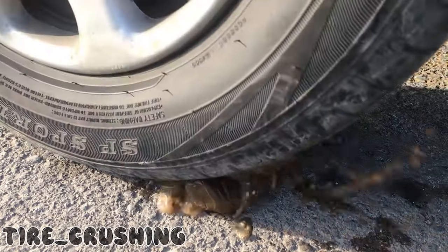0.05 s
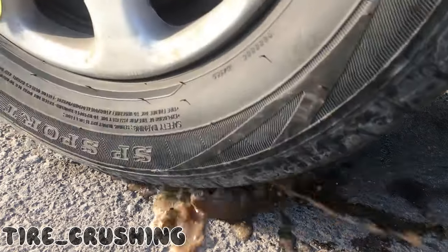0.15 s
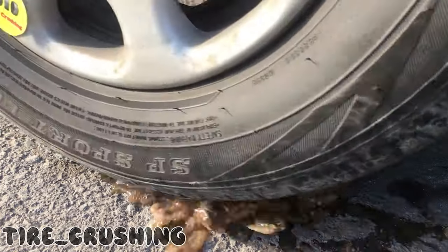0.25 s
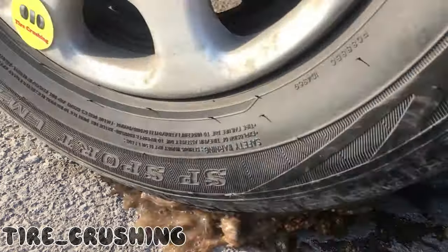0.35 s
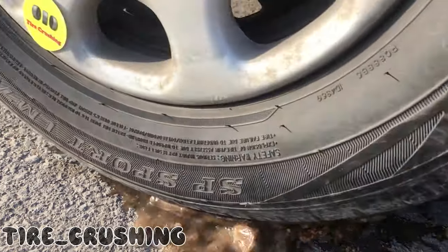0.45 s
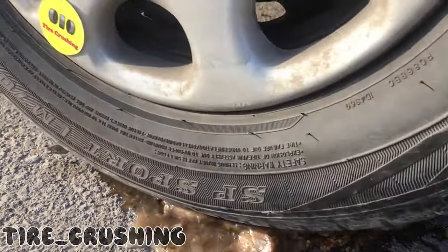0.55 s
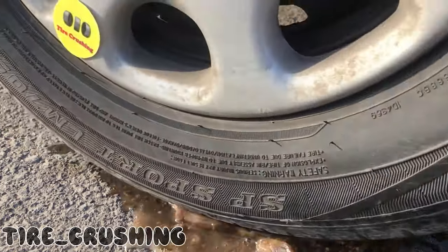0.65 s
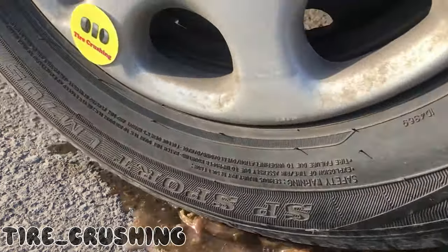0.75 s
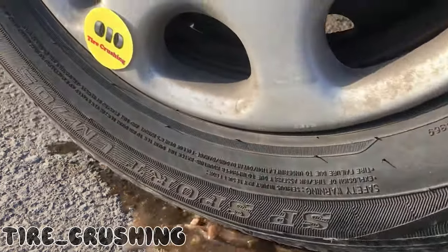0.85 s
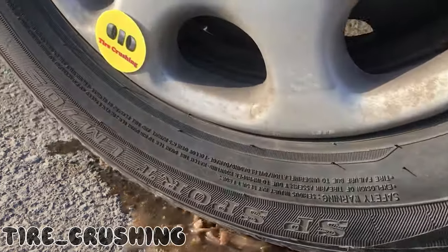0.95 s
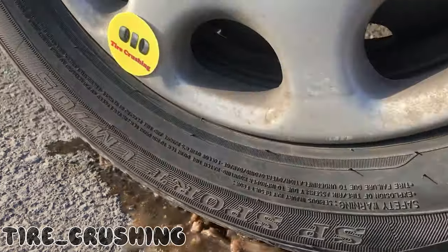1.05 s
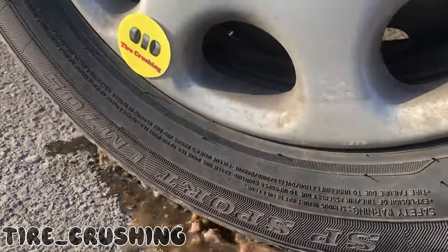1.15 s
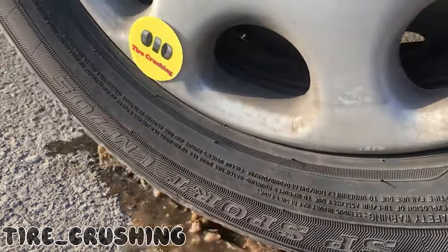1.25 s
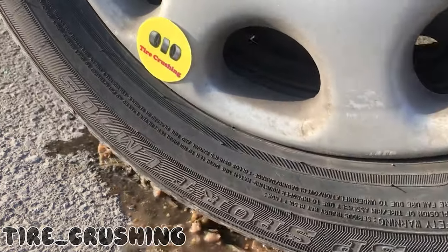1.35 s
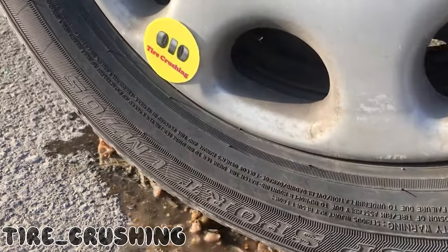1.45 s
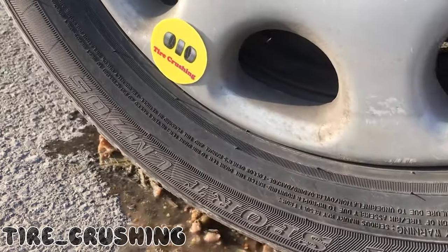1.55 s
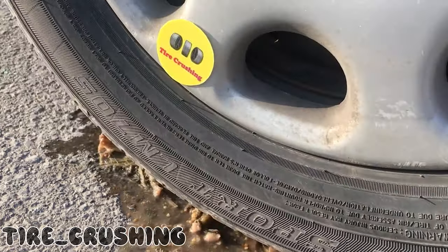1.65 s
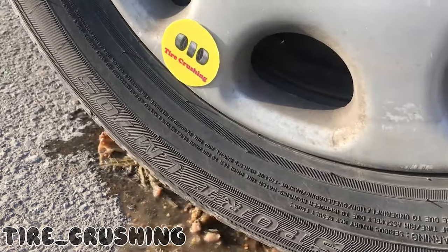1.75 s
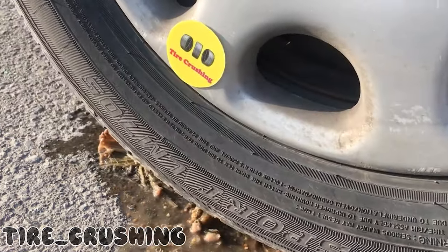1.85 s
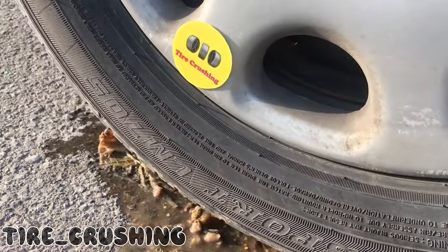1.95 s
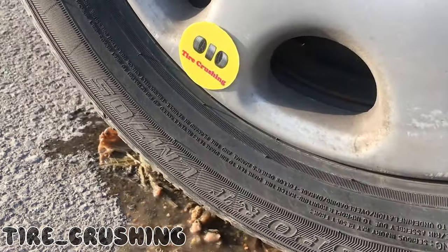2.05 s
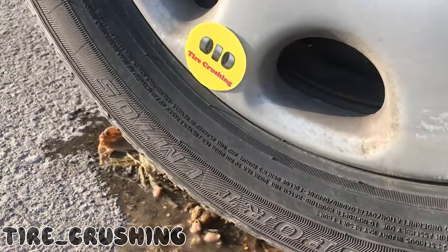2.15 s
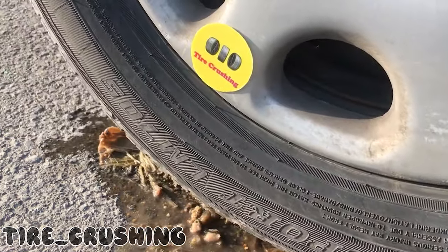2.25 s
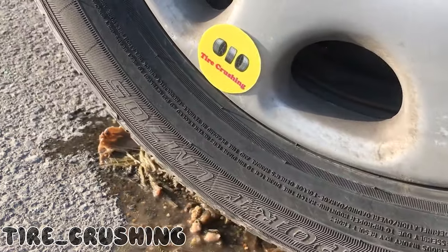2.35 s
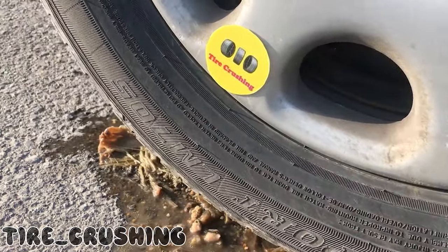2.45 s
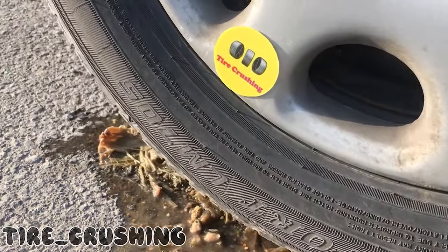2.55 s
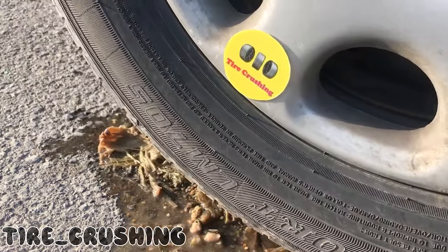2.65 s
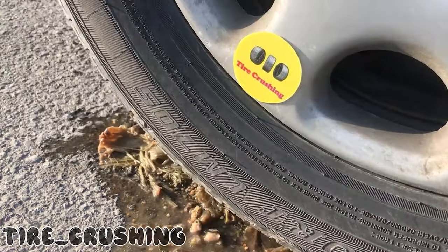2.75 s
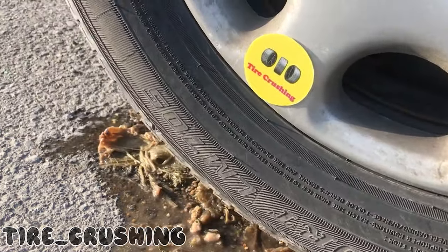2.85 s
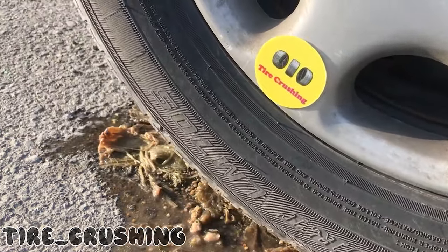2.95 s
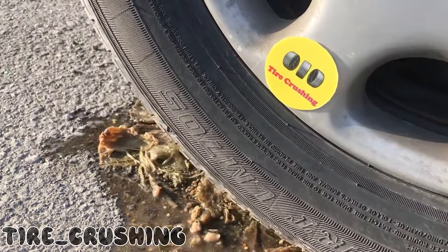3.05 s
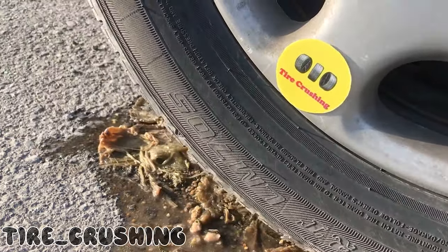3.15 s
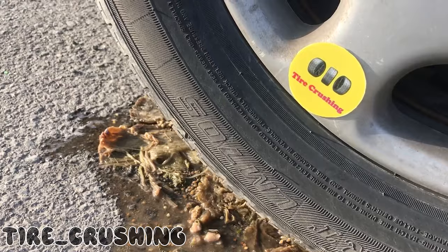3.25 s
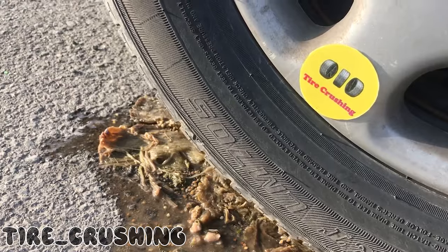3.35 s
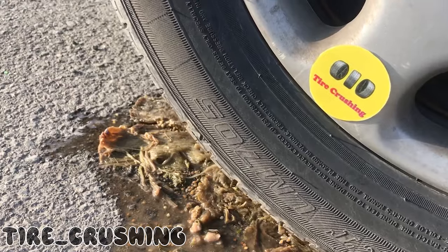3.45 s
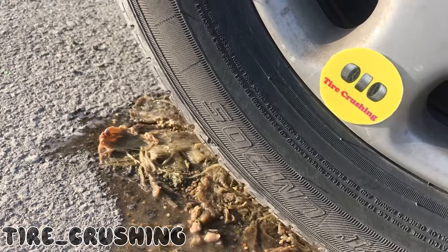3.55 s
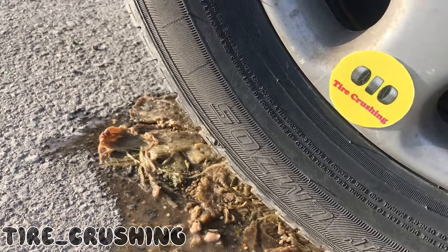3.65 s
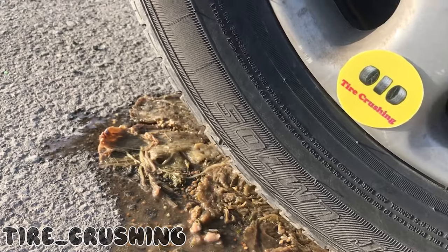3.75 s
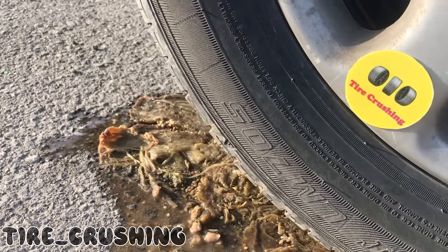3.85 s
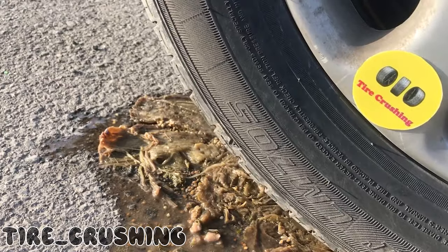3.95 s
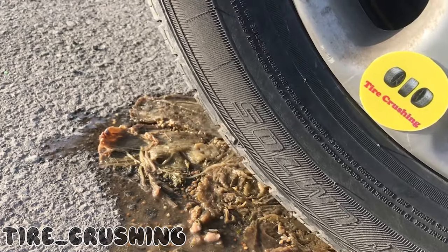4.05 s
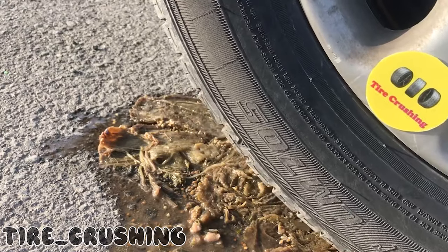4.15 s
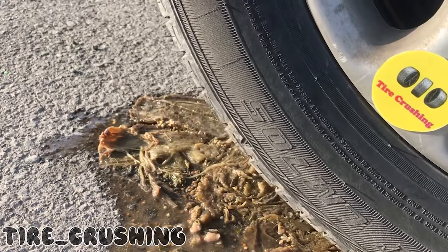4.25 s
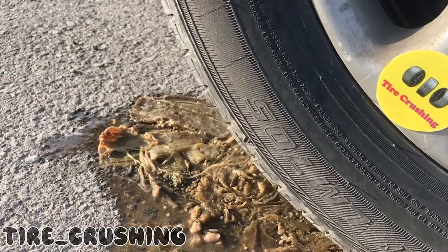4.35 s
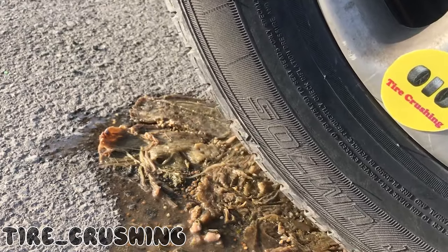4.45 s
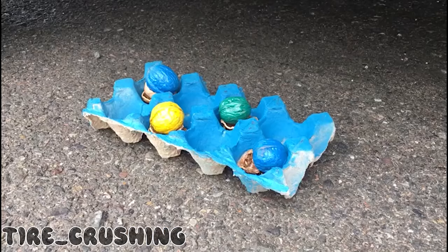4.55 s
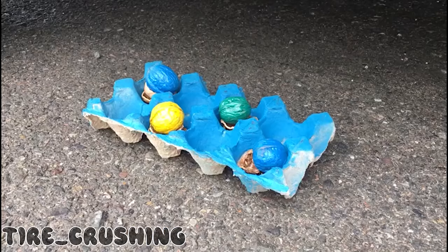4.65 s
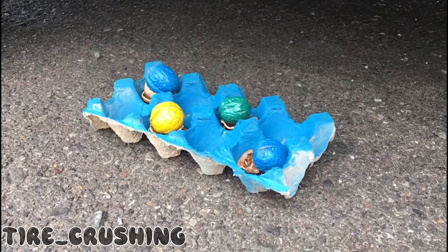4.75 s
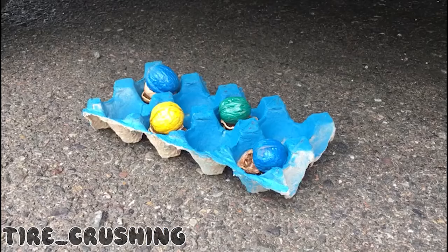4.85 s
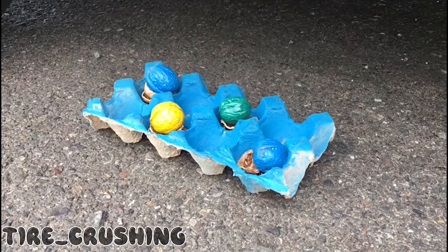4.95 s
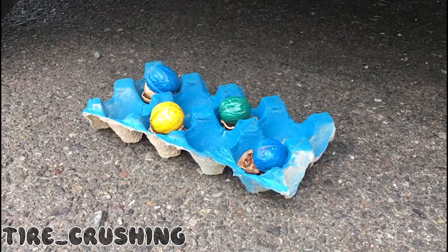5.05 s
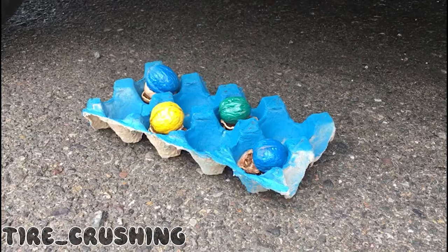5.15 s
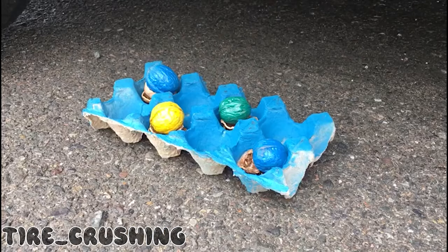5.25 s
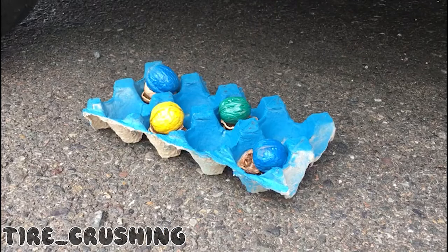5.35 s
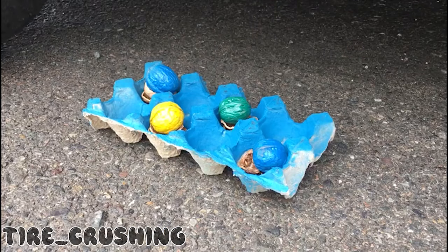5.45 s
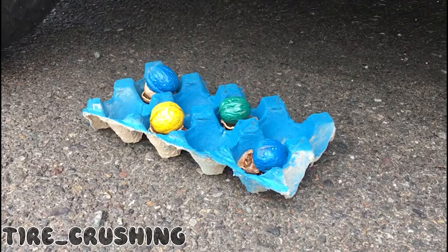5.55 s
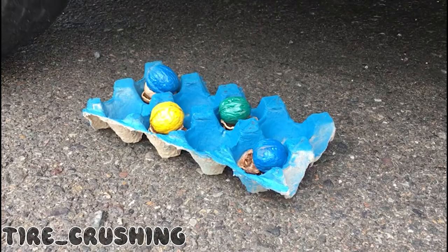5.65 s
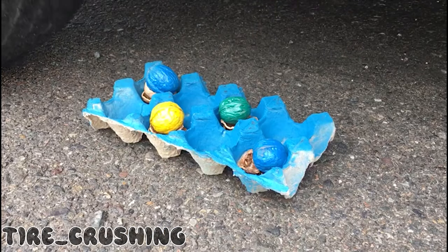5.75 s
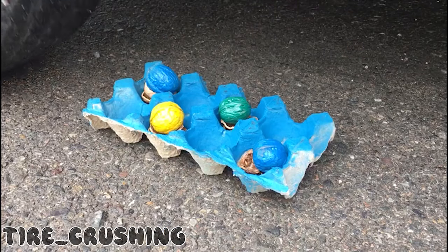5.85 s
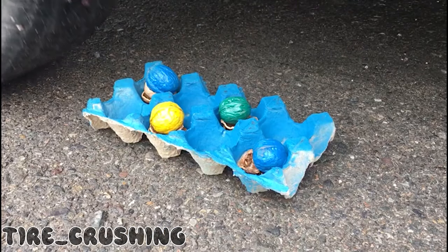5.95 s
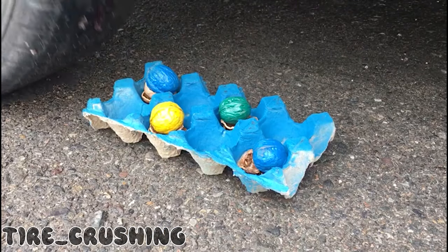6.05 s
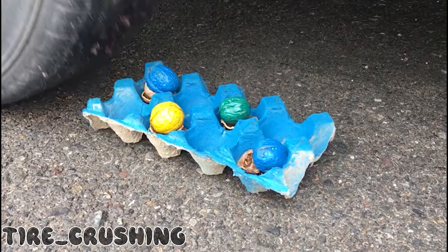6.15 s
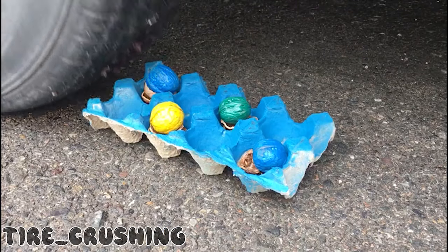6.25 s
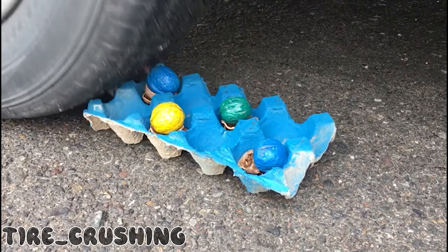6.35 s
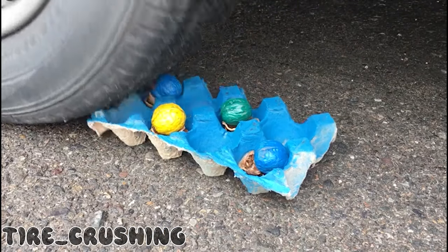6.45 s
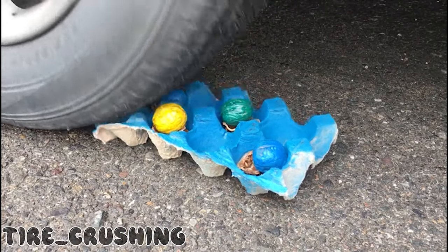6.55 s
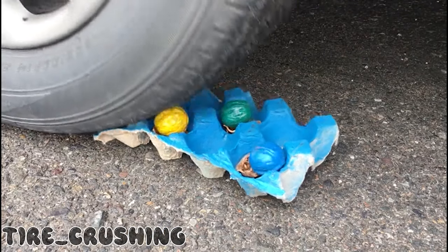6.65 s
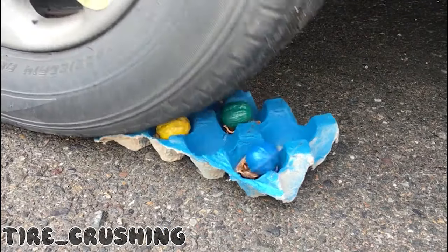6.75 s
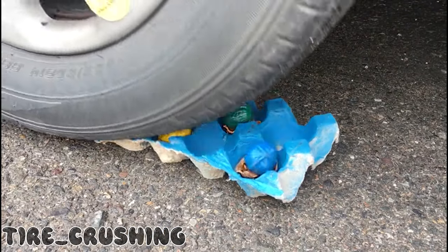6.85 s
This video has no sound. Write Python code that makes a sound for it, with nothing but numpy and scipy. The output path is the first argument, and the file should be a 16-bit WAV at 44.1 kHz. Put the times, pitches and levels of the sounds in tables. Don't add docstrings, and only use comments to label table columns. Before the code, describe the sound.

A close outdoor microphone near asphalt, in two places. From 0 to about 0.7 s a car tyre presses wet pulp and sand: soft squelchy crackle, small dull plops and quick grain pops, over faint low rumble and distant traffic. It dies away, leaving isolated tiny ticks from 1 to 4.3 s, with a faint body tap at 1.86 s. At 4.39 s a dull, hollow panel knock sounds. Around 4.56 s comes a very brief silence, then the second place: louder, darker engine idle and traffic rumble, with a soft low thump at 5.27 s. Grit pops gather from 5.8 s, crowding after 6.1 s as the tyre rolls up. At 6.5 s shells explode in dense, sharp cracks with hollow cardboard knocks and splinters, ease near 6.7 s, then burst again around 6.79 to 6.87 s with low thuds, overloading the microphone until the end.

```python
import sys
import numpy as np
from scipy import signal
from scipy.io import wavfile
from scipy.ndimage import uniform_filter1d

SR = 44100
rng = np.random.default_rng(int(sys.argv[2]) if len(sys.argv) > 2 else 0)


def level_to_linear(level):
    exponent = np.asarray(level, float) / 20
    return 10 ** exponent


def digitize_waveform(pressure):
    field = np.atleast_2d(pressure).T
    bounded = np.clip(field, -1, 1)
    quanta = np.round(bounded * 32767).astype(np.int16)
    wavfile.write(sys.argv[1], SR, quanta)


N = 303849


def evened(x):
    return x / np.sqrt(np.mean(x ** 2) + 1e-20)


def add(mix, start_s, sound):
    part = mix[round(start_s * SR):][:len(sound)]
    part += sound[:len(part)]


def curve(rows):
    time_s, level_db = np.transpose(rows)
    return level_to_linear(np.interp(np.arange(N) / SR, time_s, level_db))


def coloured(x, spectrum):
    f, db = np.transpose(spectrum)
    hz = abs(np.fft.fftfreq(8192, 1 / SR))
    log_gain = np.log(level_to_linear(np.interp(np.log(hz + 1), np.log(f + 1), np.maximum(db, -90))))
    taps = np.fft.ifft(np.exp(np.conj(signal.hilbert(log_gain)))).real
    return evened(signal.oaconvolve(x, taps[:4096])[:len(x)])


def resonate(x, hz, width_hz):
    r = np.exp(-np.pi * width_hz / SR)
    return signal.lfilter([1, 0, -1], [1, -2 * r * np.cos(2 * np.pi * hz / SR), r * r], x)


def flicker(ms, db):
    return level_to_linear(db * evened(uniform_filter1d(rng.standard_normal(N), int(ms * SR / 1000))))


def clicks(per_s, spread_db):
    at = np.cumsum(rng.exponential(1, 30000)) * SR / per_s
    size = level_to_linear(spread_db * np.minimum(rng.exponential(1, 30000), 4.0))
    size = size * rng.choice([-1., 1.], 30000)
    inside = at < N - 1
    return evened(np.bincount(at[inside].astype(int), size[inside], N))


def grains(lo_hz, hi_hz, cycles, per_s, spread_db, count=11):
    out = np.zeros(N)
    for hz in np.geomspace(lo_hz, hi_hz, count):
        t = np.arange(int(3 * cycles / hz * SR)) / SR
        pop = np.sin(2 * np.pi * hz * t) * t * np.exp(-3 * t * hz / cycles)
        pops = signal.oaconvolve(clicks(per_s / count, spread_db), pop)[:N]
        out += evened(pops) * np.sqrt(hz)
    return evened(out)


def burst(peak_db, hz, octaves, rise_s, t60_s):
    t = np.arange(int(min(rise_s + t60_s, .35) * SR)) / SR
    shape = np.minimum(t / rise_s, 1) * level_to_linear(-60 * np.maximum(t - rise_s, 0) / t60_s)
    edges_hz = np.clip(hz * 2 ** np.array([-octaves, octaves]), 20, .45 * SR)
    band = signal.butter(2, edges_hz, "band", fs=SR, output="sos")
    noise = signal.sosfilt(band, rng.standard_normal(16384))
    return level_to_linear(peak_db) * shape * evened(noise[500:])[:len(t)]


def ring(peak_db, hz, t60_s, rise_s, sag=0):
    t = np.arange(int((t60_s + 4 * rise_s) * SR)) / SR
    turns = hz * (t + sag * rise_s * (1 - np.exp(-t / rise_s)))
    wave = (1 - np.exp(-t / rise_s)) ** 2 * level_to_linear(-60 * t / t60_s) * np.sin(2 * np.pi * turns)
    return level_to_linear(peak_db) * wave / abs(wave).max()


def walnut_cracks():
    # (time [s], snap level [dB], snap pitch [Hz], tray ring level [dB], ring pitch [Hz])
    front_cracks = [(6.5003, -32, 5680, -38, 1930), (6.512, 0, 4360, -17.5, 2220),
                    (6.518, -30, 7100, -23, 1110), (6.5136, -22, 2500, -19, 890),
                    (6.5263, -36, 5200, -28, 1300), (6.5403, -13, 8600, -23, 2980),
                    (6.5407, -12, 5900, -21.5, 760), (6.5452, -4, 6300, -7, 2420),
                    (6.546, -16, 8500, -11.5, 1290), (6.5575, -24, 6500, -26, 2380),
                    (6.5616, -12, 6000, -13.5, 1530), (6.5705, -19, 4600, -30, 1090),
                    (6.573, -26, 5570, -32, 810), (6.5775, -15, 5500, -33, 880),
                    (6.5834, -22, 3780, -37, 900), (6.5861, -12, 4200, -18, 760),
                    (6.5902, -17, 5700, -22, 780), (6.596, -5, 4440, -15, 800),
                    (6.598, -23, 5550, -28, 804), (6.601, -11, 4360, -34, 1480),
                    (6.602, -22, 3180, -24, 1480), (6.6077, -17, 4580, -12.5, 1580),
                    (6.6095, -14, 3460, -16, 760), (6.6153, 0.5, 3860, -10.5, 810),
                    (6.6227, -18, 2600, -20, 1400), (6.6241, -3.5, 4500, -5.5, 1190),
                    (6.6288, -22, 2730, -15, 1290), (6.6325, -16, 2600, -14, 1740),
                    (6.6355, -5, 6170, -9, 1040), (6.644, -22, 6200, -16, 900),
                    (6.6526, -11, 6300, -7.5, 855), (6.6584, -12, 9100, -23, 800),
                    (6.6582, -5, 6500, -2, 840), (6.6619, -13, 4320, -10, 845),
                    (6.667, -16, 4260, -23, 1010), (6.67, -6.5, 7000, -4.5, 910),
                    (6.6795, -19, 2750, -34, 960), (6.684, -26, 2790, -38, 900),
                    (6.6884, -9.5, 7150, -4.5, 797), (6.696, -24, 2730, -23, 600)]
    next_cracks = [(6.704, -32.5, 3380, -29, 900), (6.7174, -22, 3100, -33, 920),
                   (6.7359, -11.5, 4460, -10.5, 890), (6.7427, -15, 3650, -25, 990),
                   (6.753, -28, 3400, -27, 860), (6.7647, -23, 3600, -33, 830),
                   (6.7767, -23, 4580, -37, 900), (6.78, -23.5, 4670, -22, 890),
                   (6.7856, -6, 3530, -12.5, 1160), (6.787, -2.5, 3700, -3, 690),
                   (6.7922, -19, 3940, -13, 606), (6.7956, -20, 3500, -14, 755),
                   (6.7992, -24, 3100, -17, 1700), (6.8025, -12, 5500, -17, 1670),
                   (6.8005, -28, 3740, -19, 1720), (6.807, -26, 3000, -25, 1900),
                   (6.811, -34, 3000, -22, 700), (6.816, -28, 3030, -29, 900),
                   (6.824, -13, 6500, -36, 2500), (6.8264, -16, 6500, -22, 2300),
                   (6.8285, -14, 6730, -32, 2000), (6.833, -10, 8100, -19, 1200),
                   (6.8335, -15, 4300, -22, 700), (6.8433, -8, 6500, -6.5, 1020),
                   (6.8447, -1, 6500, -6.5, 650), (6.8506, -20, 3660, -22, 800),
                   (6.8536, -11, 4400, -19, 650), (6.8577, -8, 6500, -20, 900),
                   (6.8606, -6.5, 5940, -19, 800), (6.863, -14, 4480, -12, 666),
                   (6.872, -21, 5000, -8, 680), (6.872, -16, 8000, -23, 700),
                   (6.8253, -16, 8500, -34, 1500), (6.8272, -12, 4200, -32, 1500),
                   (6.855, -17, 7500, -30, 1200), (6.862, -9.5, 8000, -28, 1200),
                   (6.864, -17, 6500, -28, 1200), (6.8755, -28, 7000, -30, 900)]
    ring_start_hz, ring_settle_hz = 1810, 149
    out = np.zeros(N)
    for s, snap_db, snap_hz, ring_db, ring_hz in front_cracks + next_cracks:
        split_db = 5 + (ring_db + snap_db) / 2
        add(out, s - .0003, ring(snap_db - 1.5, snap_hz, 0.0022, 0.000067))
        add(out, s - .0001, ring(snap_db - 8, 2440, 0.0012, .00004, sag=4.9))
        add(out, s - .0004, ring(snap_db - 14, 8000, 0.0012, .00005))
        add(out, s, ring(snap_db - 15.5, 4570, 0.0032, .0001))
        add(out, s - .0004, burst(snap_db - 13.5, 5000, 1.1, 0.00036, 0.0065))
        add(out, s - .0003, burst(split_db - 11, 2000, 0.69, 0.00035, 0.0055))
        add(out, s - .0002, ring(split_db - 20, rng.uniform(496, 695), 0.011, 0.0004))
        t60_s = 0.0035 + 2.55 / ring_hz
        add(out, s - .0004, ring(ring_db, ring_hz - ring_settle_hz, t60_s, 0.00061, sag=ring_start_hz / ring_hz))
        add(out, s + 0.00097, burst(ring_db - 17, 1.05 * ring_hz, 0.75, 0.00075, 0.029))
        add(out, s, burst(snap_db - 26, 4200, 0.9, 0.0011, 0.056))
    return out


def tyre_drops():
    # (time [s], level [dB], pitch [Hz], t60 [s])
    drop_rows = [(6.661, -25, 310, .03), (6.792, -22, 314, .03), (6.654, -24, 225, 0.029),
                 (6.689, -35, 80.7, 0.052), (6.787, -13.5, 204, 0.039), (6.788, -20, 87.5, 0.091),
                 (6.818, -23, 110, 0.031), (6.844, -34, 60.4, .12), (6.869, -27, 58.4, 0.12)]
    out = np.zeros(N)
    for s, db, hz, t60_s in drop_rows:
        add(out, s, ring(db, hz, t60_s, 0.0016))
    return out


def tray_crush():
    # (time [s], level [dB])
    load_rows = [(6.495, -43), (6.535, -38), (6.575, -35), (6.63, -23), (6.668, -26.5), (6.725, -43.5),
                 (6.772, -53), (6.79, -23), (6.812, -32), (6.89, -33.5)]
    # (frequency [Hz], level [dB])
    debris_spectrum = [(180, -26), (300, -10), (827, -2.5), (1950, -10.5), (2470, -12.5), (5730, -16.5),
                       (11200, -22), (12500, -38), (16200, -64.5), (22000, -120)]
    start = np.clip((np.arange(N) / SR - load_rows[0][0]) / 0.0075, 0, 1)
    splinters = (clicks(4000, 2.2) + .4 * rng.standard_normal(N)) * flicker(4, 3)
    thump = evened(resonate(rng.standard_normal(N), 214, 145)) * level_to_linear(-8)
    return start * curve(load_rows) * (coloured(splinters, debris_spectrum) + thump)


def tread_pressure(place):
    # (time [s], level [dB])
    creep_rows = [
        [(0.0, -58), (.45, -65.5), (.95, -71), (1.4, -78), (4.55, -79)],
        [(4.58, -77.5), (5.7, -68), (6.37, -62.5), (6.41, -58), (6.49, -52)],
    ]
    # (start [s], hold [s], level [dB])
    press_rows = [(0.0, 0.0054, -46.5), (0.055, .012, -55.5), (.095, 0.029, -55), (0.218, 0.02, -55.5),
                  (0.247, 0.052, -54), (0.284, 0.048, -53.5), (0.38, .01, -62), (0.137, 0.044, -63),
                  (0.42, 0.023, -77), (0.583, 0.1, -68.5), (0.676, 0.13, -66), (0.897, 0.057, -75),
                  (1.127, .07, -74), (3.643, 0.1, -86)]
    rise_s, release_db_per_s = 0.003, 400
    t = np.arange(SR // 2) / SR
    power = curve(creep_rows[place]) ** 2
    for s, hold_s, db in press_rows:
        release = level_to_linear(db - release_db_per_s * np.maximum(t - hold_s, 0))
        add(power, s, np.minimum(t / rise_s, 1) * release ** 2)
    return np.sqrt(power)


def tread_noise(place):
    # (frequency [Hz], level [dB])
    crackle_spectra = [
        [(1470, -29), (2500, -2.5), (4780, -6.5), (5190, -6.5), (5990, -7.5), (9270, -15), (10700, -23),
         (12800, -18), (16600, -42), (22000, -120)],
        [(1470, -27), (2500, 5), (3820, 0), (6370, -5), (11300, -11.5), (12000, -13), (12500, -43),
         (16200, -94), (22000, -120)],
    ]
    hiss_share, squelch_db = [0.9, 1.8][place], [-4.5, -3.5][place]
    fizz = grains(2400, 15000, 3.5, 2500, 4.0) + hiss_share * rng.standard_normal(N)
    crackle = coloured(fizz * flicker(12, 2.3), crackle_spectra[place])
    squelch = grains(900, 2400, 3, 900, 3.3, count=5) * flicker(12, 3) * level_to_linear(squelch_db)
    return (crackle + squelch) * tread_pressure(place)


def stray_grains():
    per_s, mean_db, lo_hz, hi_hz = 9.0, -59.5, 2600, 11400
    gap, size, pitch = rng.random((80, 3)).T
    s = np.cumsum(-np.log(gap)) / per_s
    rows = np.transpose([s, mean_db + 8 * (size - .5), lo_hz * (hi_hz / lo_hz) ** pitch ** 4])
    return rows[s < N / SR - .1].tolist()


def grit():
    # (time [s], peak level
    # [dB], pitch [Hz])
    resting_rows = [(0.0141, -43, 8800), (0.062, -47, 2840), (0.0971, -32.5, 9100), (0.127, -33, 6460),
                    (0.22, -40, 9000), (0.289, -37, 7800), (0.329, -34.5, 5350), (0.3352, -36, 4000),
                    (0.3535, -41, 8540), (0.3928, -45, 2640), (0.4329, -47, 6240), (0.4919, -48, 7200),
                    (0.5134, -51, 5330), (0.606, -48, 6800), (0.619, -45, 5500), (0.7096, -43.5, 4580),
                    (0.8126, -46, 5670), (0.9173, -45, 2600), (1.107, -42, 2470), (1.1892, -49, 3050),
                    (1.476, -47, 5450), (1.6612, -48.5, 5600), (2.1639, -51.5, 3600), (2.471, -52.5, 2700),
                    (2.5784, -49, 3230), (2.602, -48.5, 2930), (3.1005, -49, 2600), (3.6464, -50, 2800),
                    (3.7384, -42.5, 2900), (4.306, -48, 3260),
                    (0.043, -46, 8500), (.0425, -50, 3300), (.072, -45, 4300), (.085, -43, 8000),
                  (.1156, -41, 7000), (.191, -48, 7000), (.149, -50, 13000), (.3, -48, 13500),
                  (0.256, -39, 5300), (.269, -37, 5470), (.302, -40, 5030), (.311, -42, 5500),
                  (.398, -48, 11500), (.4071, -48, 3290), (.4234, -45, 2600), (.4388, -58, 5290),
                  (.446, -55, 13000), (.46, -57, 5660), (.4831, -55, 2990), (.4884, -54, 4410),
                  (.4979, -50, 3660), (.507, -53, 3960), (.6065, -46, 11000), (.6633, -53, 11000),
                  (.6948, -45, 4170), (.7339, -46, 3440), (.7387, -48, 3270), (0.778, -50, 6150),
                  (.802, -49, 2900), (.841, -53, 4580), (.9261, -57, 5340), (.962, -64, 12500),
                  (1.049, -48, 3120), (1.14, -52, 2640), (1.1799, -55, 8300), (1.2932, -54, 3010),
                  (1.3246, -58, 3200), (1.3696, -50, 3200), (1.6716, -46, 2880), (1.8634, -48, 3300),
                  (1.8657, -53, 3180), (1.874, -57, 5300), (1.98, -53, 3360), (2.024, -57, 3120),
                  (2.0803, -58, 6780), (2.2826, -56, 3070), (2.4439, -55, 2820), (2.5081, -54, 3100),
                  (2.6361, -54, 3290), (3.1818, -56, 3120), (3.4701, -54, 2880), (3.5238, -51, 3010),
                  (3.7123, -52.5, 3380), (3.655, -62, 4500), (3.8878, -57, 3400), (3.9531, -62, 5267),
                  (3.9918, -55, 3740), (4.0925, -55, 5270), (4.1123, -54.5, 9130), (4.4441, -59, 2710)]
    coming_rows = [(4.689, -42, 3428), (4.901, -43, 2600), (5.587, -41, 2600), (5.806, -39, 2600),
                   (5.8292, -37.5, 2600), (5.909, -44, 3020), (5.921, -68, 8050), (6.0126, -46, 2600),
                   (6.1015, -32.5, 2460), (6.1443, -35, 2570), (6.1765, -35, 2570), (6.198, -40.5, 2370),
                   (6.2519, -40.5, 3650), (6.2701, -35.5, 2560), (6.2892, -38, 2600), (6.2993, -32.5, 2450),
                   (6.3234, -40, 2600), (6.3514, -52, 2240), (6.4105, -42, 2440), (6.4422, -37, 2260),
                   (6.4622, -47, 2320), (6.4715, -37, 2430), (6.3961, -57, 8770), (6.4097, -45, 8900),
                   (6.4312, -44, 10100)]
    out = np.zeros(N)
    for s, db, hz in resting_rows + coming_rows + stray_grains():
        add(out, s - .0004, ring(db - 2.5, hz, 0.0035, 0.00014))
        add(out, s - .0004, burst(db - 19, 1.11 * hz, 0.6, 0.00019, 0.033))
        add(out, s - .0004, burst(db - 15, 6300, 1.1, .0002, 0.0021))
        add(out, s - .0006, ring(db - 8.5, rng.uniform(1400, 2200), .008, .0004))
    return out


def plops():
    # (time [s], peak level [dB], pitch [Hz])
    plop_rows = [(.0045, -33, 1670), (0.012, -44, 1390), (0.0584, -46, 1110), (0.0914, -42, 1430),
                 (0.2196, -40, 1180), (.326, -34.5, 880), (0.3394, -40, 1580), (.102, -53, 2600),
                 (.112, -45, 3140), (.119, -46, 2440), (.131, -44, 2480), (.301, -45, 2300),
                 (.331, -41, 1980), (.003, -43, 3200), (.008, -43, 2500), (.015, -43, 3400),
                 (.062, -44, 2800), (4.3895, -42, 2200), (5.27, -39, 260), (.592, -49, 1700),
                 (.61, -45, 2000), (1.1055, -43, 1730), (3.662, -63, 2900), (3.673, -62, 3600),
                 (3.689, -55, 2730), (4.9, -48, 1900), (0.3883, -42, 1360), (.41, -52, 1090),
                 (0.422, -53, 1290), (0.513, -45, 1520), (.5283, -50, 1630), (0.5727, -42, 1440),
                 (.6338, -46, 1140), (0.663, -37.5, 1480), (.7351, -50, 1420), (0.768, -51, 970),
                 (0.8004, -44, 1780), (0.913, -52, 1510), (1.049, -53, 1460), (5.804, -35.5, 1300),
                 (5.828, -43, 1080), (6.2699, -40, 1690), (6.299, -41, 1790)]
    out = np.zeros(N)
    for s, db, hz in plop_rows:
        add(out, s, ring(db, hz, t60_s=0.0062, rise_s=0.00038))
    return out


def scuffs_and_tap():
    # (time [s], level [dB], centre [Hz], t60 [s])
    scuff_rows = [(0.0, -41, 1980, 0.047), (0.0, -44, 260, 0.12), (.105, -49.5, 2200, 0.21),
                  (0.281, -49, 294, 0.33), (.24, -51, 6370, 0.23), (.445, -46.5, 396, 0.069),
                  (.57, -52.5, 1360, 0.23), (.605, -60, 1750, 0.049), (.655, -52, 1430, 0.059),
                  (.732, -57, 4200, 0.22), (3.678, -53.5, 3240, 0.12), (3.679, -74, 8000, .044),
                  (4.095, -65, 11000, 0.041), (4.388, -39.5, 1350, 0.064), (4.389, -55, 5500, 0.05),
                  (4.675, -61, 5670, 0.32), (5.268, -41.5, 288, 0.12), (6.455, -50, 5030, .2),
                  (.15, -42, 1620, 0.019), (.386, -43, 1750, 0.059), (.219, -55, 6000, .05)]
    # (level [dB], centre [Hz], half width [octaves], t60 [s])
    tap_bands = [(-45, 250, 0.59, 0.24), (-49, 700, 0.37, 0.15), (-43, 1630, 0.29, 0.14),
                 (-52, 3060, 0.31, 0.081)]
    rise_share = 0.019
    out = np.zeros(N)
    for s, db, hz, t60_s in scuff_rows:
        add(out, s, burst(db, hz, 0.48, rise_share * t60_s, t60_s))
    for db, hz, octaves, t60_s in tap_bands:
        add(out, 1.86, burst(db, hz, octaves, rise_share * t60_s, t60_s))
    return out


def panel_knock():
    # (frequency [Hz], level [dB], t60 [s])
    knock_modes = [(128, -46.5, 0.45), (189, -38, 0.25), (217.4, -47, 0.29), (269, -32, 0.062),
                   (322, -38, 0.096), (577, -33.5, 0.03), (1520, -51.5, 0.27), (2300, -41.5, 0.039)]
    knock_s = 4.391
    out = np.zeros(N)
    for hz, db, t60_s in knock_modes:
        add(out, knock_s, ring(db, hz, t60_s, 0.00042))
    add(out, knock_s, burst(-41, 217, 0.75, 0.0059, 0.27))
    return out


def engine_idle():
    # (frequency [Hz], level [dB], heard until [s])
    engine_tones = [(75.7, -48, 7.0), (122, -55, 5.25), (153.2, -53.5, 5.1), (151.6, -55, 7.0),
                    (59, -60, 7.0)]
    sag_per_s = 0.002015
    t, out = np.arange(N) / SR, np.zeros(N)
    for hz, db, until_s in engine_tones:
        turns = np.cumsum(hz * (1 - sag_per_s * (t - 5.5)) * flicker(150, .02)) / SR
        fade = np.clip((until_s - t) / 0.051, 0, 1)
        out += level_to_linear(db + 3) * flicker(120, 1.7) * np.sin(2 * np.pi * turns) * fade
    return out


def rumble_and_traffic(place):
    # (time [s], level [dB])
    near_rows = [
        [(0.0, -52.5), (2.2, -58.5), (3.2, -58), (4.55, -60)],
        [(4.58, -44), (5.57, -49.5), (6.35, -50), (6.49, -46.5)],
    ]
    # (frequency [Hz], level [dB])
    rumble_spectra = [
        [(15, -47), (29, -12), (41, -0.5), (59, 3), (82, 0.5), (102, -9), (134, -6), (200, -16.5), (260, -46),
         (440, -120)],
        [(15, -34), (30, -25), (48, -0.5), (70, 3), (100, -7), (157, -8.5), (200, -21), (260, -36), (440, -120)],
    ]
    # (frequency [Hz], level [dB])
    traffic_spectra = [
        [(290, -38.5), (500, 2), (900, -0.5), (1240, 1), (1700, -2), (1900, -8.5), (2400, -15.5), (3870, -23),
         (4940, -30), (6400, -29), (12300, -35), (13500, -49), (16600, -61), (22000, -120)],
        [(290, -23.5), (500, 7.5), (572, 1), (1060, 5.5), (1200, 6), (1950, 2.5), (4260, -23.5), (9050, -35.5),
         (11400, -36.5), (12500, -73), (16200, -95), (22000, -120)],
    ]
    # (frequency [Hz], level [dB])
    drone_spectrum = [(100, -34.5), (170, -4.5), (393, -6.5), (497, -22), (560, -19), (730, -52.5),
                      (1230, -120)]
    rumble_db, drone_db = [-51.5, -46.5][place], [-60.5, -55.5][place]
    near = curve(near_rows[place])
    reference = near[round(near_rows[place][1][0] * SR)]
    swell = (near / reference) ** 0.48
    rumble = coloured(rng.standard_normal(N), rumble_spectra[place]) * swell * level_to_linear(rumble_db)
    traffic = coloured(rng.standard_normal(N) * flicker(30, 1.23), traffic_spectra[place]) * near * level_to_linear(-1)
    drone = coloured(rng.standard_normal(N) * flicker(48, 1.3), drone_spectrum) * level_to_linear(drone_db)
    return rumble + traffic + drone


def scene():
    first_end_s, second_start_s = 4.5585, 4.5755
    second_edge_hz, overload = 11860, 1.08
    t = np.arange(N) / SR
    events = grit() + plops() + scuffs_and_tap() + panel_knock()
    first = tread_noise(0) + rumble_and_traffic(0) + events
    first = first * np.clip((first_end_s - t) / 0.0012, 0, 1)
    second = walnut_cracks() + tyre_drops() + tray_crush() + tread_noise(1) + events
    second = second + engine_idle() + rumble_and_traffic(1)
    second = second * np.clip((t - second_start_s) / 0.00041, 0, 1)
    second = np.tanh(second / overload) * overload
    low_pass = signal.firwin(255, second_edge_hz, window=("kaiser", 5.0), fs=SR)
    narrow = signal.oaconvolve(second, low_pass, "same")
    add(narrow, 6.5451, ring(-36, 14000, .0012, .0001))
    return (first + narrow)[None]


def band_limit(x):
    return signal.sosfilt(signal.butter(12, 15800, fs=SR, output="sos"), x)


def record(dry):
    mix = np.clip(dry, -1, 1)
    return band_limit(mix)


dry = scene()
out = record(dry)
digitize_waveform(out)
```